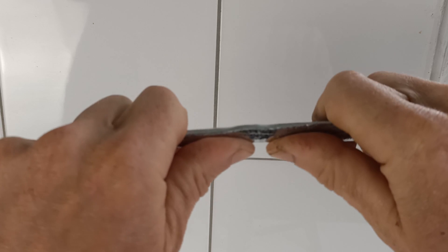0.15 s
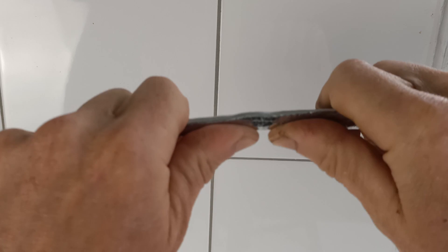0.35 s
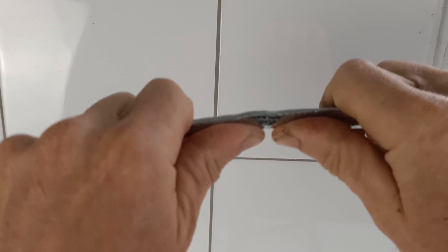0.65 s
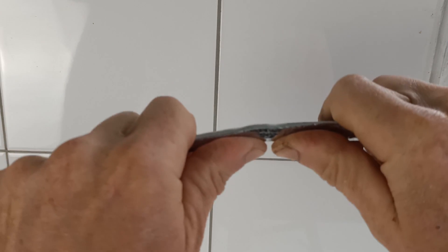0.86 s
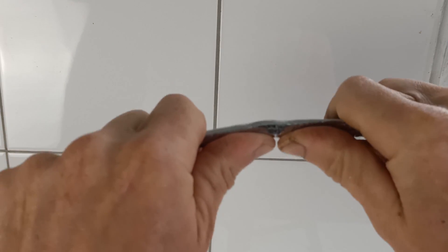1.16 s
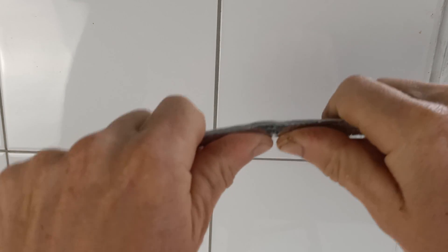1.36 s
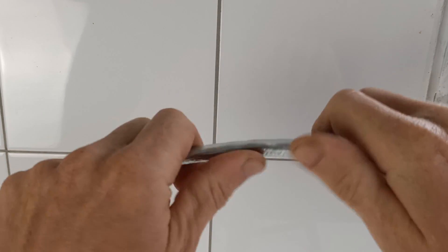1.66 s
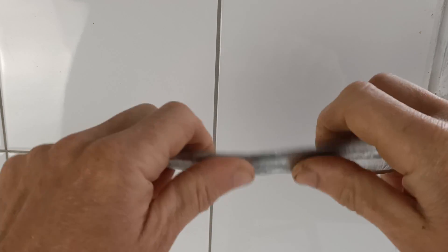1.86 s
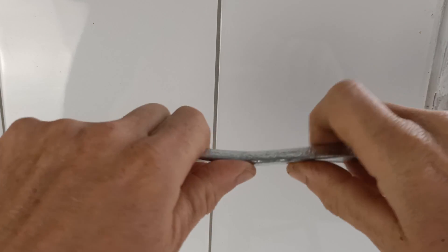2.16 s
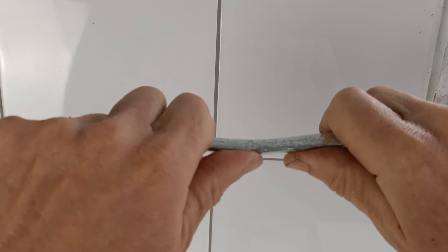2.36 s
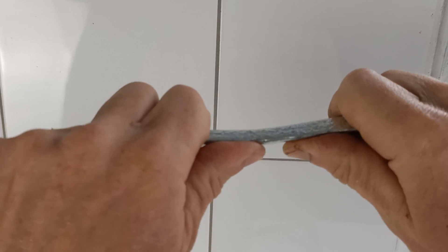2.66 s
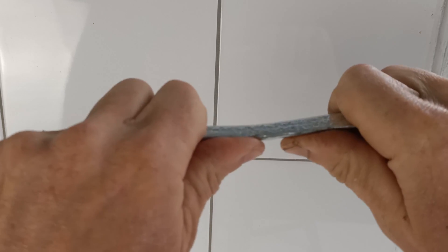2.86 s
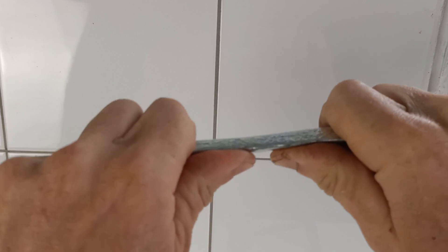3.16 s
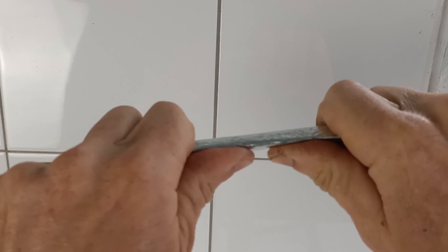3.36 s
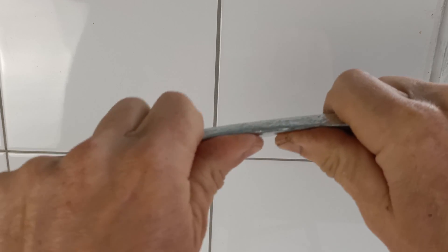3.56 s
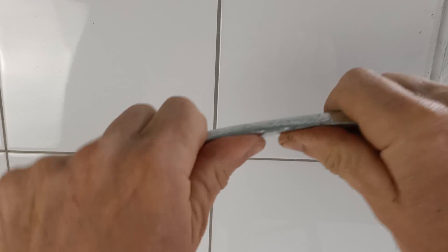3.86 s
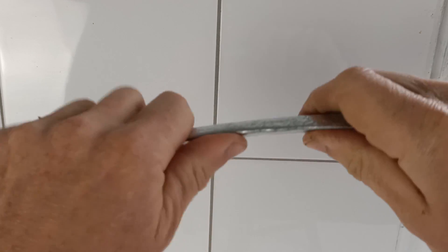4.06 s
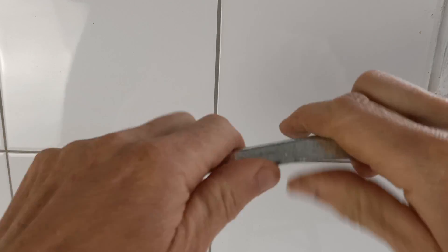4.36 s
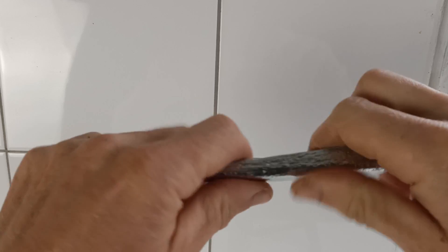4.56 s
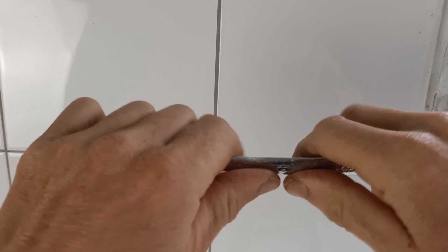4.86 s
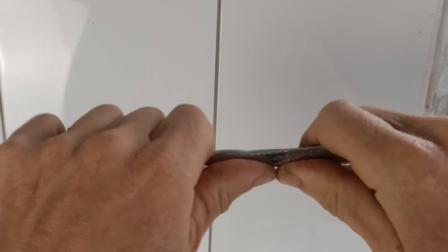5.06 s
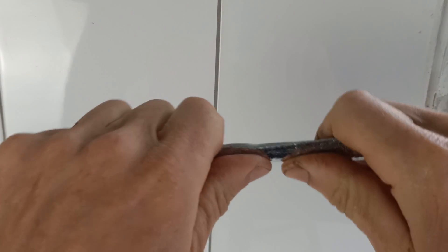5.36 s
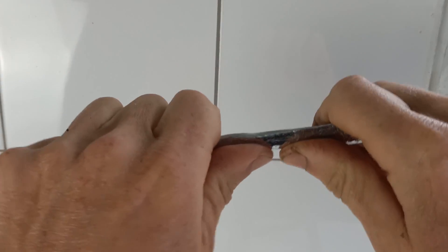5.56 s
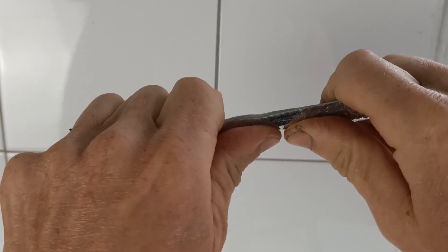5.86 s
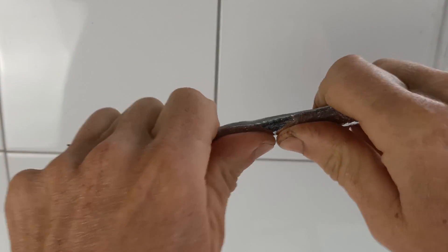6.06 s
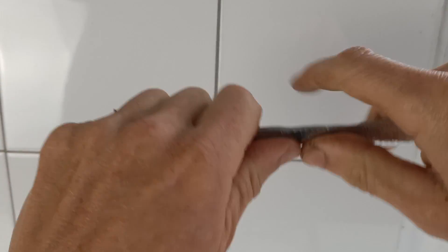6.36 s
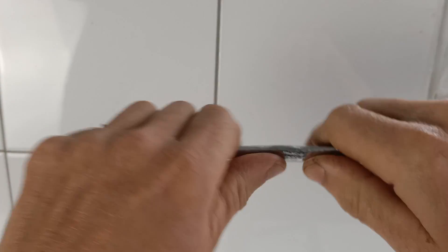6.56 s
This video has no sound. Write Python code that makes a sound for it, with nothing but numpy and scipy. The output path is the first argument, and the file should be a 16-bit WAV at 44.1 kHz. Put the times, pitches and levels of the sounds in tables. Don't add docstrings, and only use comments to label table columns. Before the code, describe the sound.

Close crisp snaps and showers of tiny ticks as a soft metal bar is flexed three times, the last bend barely whispering.

```python
import sys
import numpy as np
from scipy import signal
from scipy.fft import rfft, irfft, next_fast_len
from scipy.io import wavfile
from scipy.ndimage import uniform_filter1d

SR = 44100
rng = np.random.default_rng(int(sys.argv[2]) if len(sys.argv) > 2 else 0)


def waveform_to_disk(signal):
    frames = np.transpose(np.atleast_2d(signal))
    scaled = np.clip(frames, -1, 1) * 32767
    samples = np.round(scaled).astype(np.int16)
    wavfile.write(sys.argv[1], SR, samples)


def boost_factor(decibels):
    exponent = np.asarray(decibels, float) / 20
    return 10 ** exponent


N = 295911
BURST_SAMPLES = 1024

# hz [Hz], likeness [0..1, below 0 counts as 0]
NOISE_LIKENESS = [(60, 0.047), (380, -0.28), (2380, -0.15), (15000, -0.12)]


def at_hz(points, hz):
    table_hz, value = np.transpose(points)
    return np.interp(np.log(hz + 1), np.log(table_hz), value)


def in_time(rows, outside):
    s, *columns = np.transpose(rows)
    return [np.interp(np.arange(N) / SR, s, c, outside, outside) for c in columns]


def rms_one(x):
    return x / np.sqrt(np.mean(x ** 2) + 1e-20)


def split_at(x, hz, kind):
    return signal.sosfilt(signal.butter(4, hz, kind, fs=SR, output="sos"), x)


def spell(start_s, length_s, edge_s):
    age_s = np.arange(N) / SR - start_s
    return age_s, np.clip(np.minimum(age_s, length_s - age_s) / edge_s, 0, 1)


def pair(mid, side, likeness, balance_db):
    alike = np.clip(likeness, 0, 1)
    mid = np.sqrt(1 + alike) * mid
    side = np.sqrt(1 - alike) * side
    return np.array([(mid + side) * boost_factor(balance_db / 2), (mid - side) * boost_factor(-balance_db / 2)])


def coloured(spectrum, likeness, balance):
    size = next_fast_len(N)
    hz = np.fft.rfftfreq(size, 1 / SR)
    mid, side = rfft(rng.standard_normal((2, size)))
    both = pair(mid, side, at_hz(likeness, hz), at_hz(balance, hz))
    return rms_one(irfft(both * boost_factor(at_hz(spectrum, hz)), size)[:, :N])


def room_tone():
    tone_spectrum = [(180, -28), (300, -6), (484, -1.5), (590, -2.5), (769, -3.5), (1050, -5.5),
                     (1670, -2.5), (2040, -5.5), (2480, -6.5), (2690, -6.5), (3690, -8), (5130, -14),
                     (8560, -11.5), (9600, -13.5), (15500, -12)]
    tone_balance = [(60, 19), (180, 15), (550, 5), (1650, 10), (4970, 4), (15000, 1.5)]
    return boost_factor(-53) * coloured(tone_spectrum, NOISE_LIKENESS, tone_balance)


def tremor():
    # s [s], level_db [dB]
    effort = [
        (0.0, -63),
        (1.14, -57.5),
        (1.34, -61.5),
        (2.49, -63),
        (3.12, -56),
        (4.09, -61.5),
        (5.53, -63.5),
        (5.79, -60),
        (6.71, -64.5),
    ]
    rumble_spectrum = [(12, -22), (20, 1), (27, -22), (46, -7.5), (70, -5.5), (98, -2), (300, -12.5),
                       (390, -13), (660, -120)]
    casing_spectrum = [(150, -50), (225, -26), (255, 8.5), (290, -11), (420, -24.5)]
    # middle_s [s], half_length_s [s], level_db [dB]
    hum_spells = [
        (1.098, 0.23, -54),
        (4.497, 0.83, -60.5),
        (5.806, 0.28, -66.5),
    ]
    rumble_db, = in_time(effort, None)
    t_s = np.arange(N) / SR
    hum = sum(boost_factor(level_db) * np.exp(-((t_s - middle_s) / half_s) ** 2)
              for middle_s, half_s, level_db in hum_spells)
    alike, lean_db = [(30, 0.5), (300, 0.24)], [(30, 11.0), (300, 4.7)]
    rumble = boost_factor(rumble_db + 3.0) * coloured(rumble_spectrum, alike, lean_db)
    return rumble + hum * coloured(casing_spectrum, alike, lean_db)


def bursts(low_db, top_db, life_s, ring):
    # hz [Hz], density_db [dB per Hz]
    left_spectrum = [(80, -59), (200, -17), (900, -24), (1400, -16), (1800, -21.5), (2700, -11),
                     (3400, -10.5), (4500, -16.5), (6000, -11), (7200, -8), (8500, 1.5), (9700, -0.5),
                     (11000, -12), (15500, -10.5)]
    # hz [Hz], density_db [dB per Hz]
    right_spectrum = [(80, -27), (300, -19), (900, -26), (1400, -17.5), (1800, -19.5), (3300, -11),
                      (4500, -16), (6600, -1), (8200, -10), (9400, -5.5), (11200, -6.5), (12800, -6.5),
                      (13800, 0), (15500, -8)]
    snap_likeness = [(300, 1), (1400, 0.85), (3000, 0.55), (4400, 0.11), (6200, 0.79), (9000, 0.16),
                     (12000, 0.43)]
    crack_db, crack_t60_s, right_lag_s = 10, 0.0022, -0.000014
    t_s, hz = np.arange(BURST_SAMPLES) / SR, np.fft.rfftfreq(BURST_SAMPLES, 1 / SR)
    age_s = np.maximum(t_s - 26 / SR, 0)
    rattle = boost_factor(-60 * age_s / life_s[:, None, None])
    crack = boost_factor(crack_db - 60 * age_s / crack_t60_s)
    shape = (1 - np.exp(-age_s / 0.00018)) * (rattle + crack)
    spectra = rfft(rng.standard_normal((len(life_s), 2, BURST_SAMPLES)) * shape)
    spectra = spectra / np.sqrt(uniform_filter1d(np.abs(spectra) ** 2, size=36))
    left, right = pair(spectra[:, 0], spectra[:, 1], at_hz(snap_likeness, hz), 0)
    lag = np.exp(-2j * np.pi * hz * right_lag_s)
    both = np.array([left * boost_factor(at_hz(left_spectrum, hz)), right * boost_factor(at_hz(right_spectrum, hz)) * lag])
    end_hz, width_hz, end_db = ring
    both = both * boost_factor(end_db * np.exp(-((hz - end_hz) / width_hz) ** 2))
    peak = np.sqrt(np.mean(irfft(both) ** 2, axis=0).max(axis=1))
    low = 1 / (1 + (hz / 4700) ** 8)
    top = 1 / (1 + (11300 / (hz + 1)) ** 12)
    colour = boost_factor(np.outer(low_db, low) + np.outer(top_db, top))
    return irfft(both * colour / peak[:, None])


def showers(per_s, spread_db):
    # s [s], level_db [dB]
    effort_curves = [
        [(0.15, -66), (0.49, -45.5), (0.62, -51), (0.724, -45.5), (1.01, -77), (1.086, -38.5), (1.22, -39),
         (1.3, -77)],
        [(2.7, -63), (2.84, -29.5), (2.94, -36.5), (3.1, -32), (3.47, -38.5), (3.644, -33.5), (3.85, -57.5)],
        [(5.5, -68), (5.566, -59.5), (5.84, -53.5), (5.87, -46.5), (6.1, -59.5), (6.15, -90)],
    ]
    body_db = [
        -0.5,
        -5,
        -4.5,
    ]
    ticks = (rng.random(N) < per_s / SR) * boost_factor(spread_db * np.minimum(rng.exponential(1, N), 4))
    kinds = bursts(np.zeros(12), np.zeros(12), np.full(12, 0.004), (9050, 850, 5.5))
    dealt = rng.integers(0, 12, N)
    hail = 0
    for k in range(12):
        hail = hail + signal.fftconvolve(ticks[None] * (dealt == k), kinds[:, k], axes=1)[:, :N]
    hail = rms_one(hail)
    low, high = split_at(hail, 4700, "low"), split_at(hail, 4700, "high")
    out = 0
    for rows, low_db in zip(effort_curves, body_db):
        level_db, = in_time(rows, -150)
        out = out + boost_factor(level_db) * (high + boost_factor(low_db + 9) * low)
    return out


def snaps(rows, ring, top_db):
    s, peak_db, t60_ms, low_db = np.transpose(rows)
    top_db = top_db + 3 * rng.standard_normal(len(s)) - 0.28 * (peak_db + 14)
    life_s = 1.81 * np.clip(t60_ms, 1, 22) / 1000
    sounds = bursts(low_db + 10.5, top_db + 7.5, life_s, ring) * boost_factor(peak_db + 2.5)[:, None]
    out = np.zeros((2, N + BURST_SAMPLES))
    for k, at in enumerate(np.round(s * SR).astype(int) - 32):
        out[:, at:at + BURST_SAMPLES] += sounds[:, k]
    return out[:, :N]


def tiled_room(x, gap_s):
    tile_bands = np.array([(500, 0.34, 1), (2580, 0.25, 4), (4470, 0.29, 3), (5960, 0.2, 7),
                           (8900, 0.24, -3), (15000, 0.15, 6.5)])
    early_t60_s, late_db = 0.07, 1
    t_s = np.arange(SR // 2) / SR
    edges_hz = 200 * 2.0 ** np.arange(0, 6.6, 1 / 3)
    tail = 0
    for low, high in zip(edges_hz, edges_hz[1:]):
        sos = signal.butter(2, [low, high], "band", fs=SR, output="sos")
        band = signal.sosfilt(sos, rng.standard_normal((2, len(t_s))))
        t60_s, level_db = (at_hz(tile_bands[:, [0, k]], np.sqrt(low * high)) for k in (1, 2))
        decay = boost_factor(-60 * t_s / early_t60_s) + boost_factor(late_db - 60 * t_s / t60_s)
        tail = tail + band * boost_factor(level_db) * decay
    tail = tail * np.clip(t_s / gap_s - 1, 0, 1)
    return signal.fftconvolve(x, tail / np.sqrt(np.sum(tail ** 2) / 2), axes=1)[:, :N]


def knocks():
    grip_knocks = [
        (0.494, -35, 16.5),
        (.4995, -41, 20.5),
        (3.911, -47, 1),
        (3.941, -52.5, 0),
        (4.239, -34.5, 6.5),
        (4.372, -54, 11),
        (4.530, -49, 2),
        (4.555, -51, -4),
        (5.018, -55, -3),
    ]
    # hz [Hz], level_db [dB], t60_s [s]
    hand_modes = [
        (102, 8.5, 0.032),
        (187, 7.5, 0.027),
        (240.5, 9, 0.07),
        (449.5, -4, 0.05),
        (1110, -19, 0.1),
    ]
    s, peak_db, upper_db = np.transpose(grip_knocks)
    out = np.zeros(N)
    for hz, level_db, t60_s in hand_modes:
        push = np.full(N, 1e-18)
        push[np.round(s * SR).astype(int)] = -boost_factor(peak_db + level_db - 7 + upper_db * (hz > 300))
        r, w = boost_factor(-60 / (t60_s * SR)), 2 * np.pi * hz / SR
        out += signal.lfilter([0, np.sin(w)], [1, -2 * r * np.cos(w), r * r], push)
    return signal.sosfilt(signal.butter(2, 55, "high", fs=SR, output="sos"), out) * boost_factor([[1.2], [-1.2]])


def whine(octave_db):
    whine_spells = [
        (1.31, 0.092, 800, 5, -66.5),
        (1.367, 0.33, 858, 12, -70.5),
        (1.956, .15, 787, -150, -75),
    ]
    flutter_sos = signal.butter(2, 14, fs=SR, output="sos")
    flutter = rms_one(signal.sosfilt(flutter_sos, rng.standard_normal(N)))
    out = 0
    for start_s, length_s, hz, glide, level_db in whine_spells:
        age_s, gain = spell(start_s, length_s, edge_s=0.024)
        phase = 2 * np.pi * (hz + glide * age_s / 2) * age_s
        tone = np.sin(phase) + boost_factor(octave_db) * np.sin(2 * phase)
        out = out + gain * boost_factor(level_db + 7.0 + 2.9 * flutter) * tone
    return out * boost_factor([[2.5], [-2.5]])


def slides():
    skin_slides = [
        (1.676, -68, 18, 0.23),
        (4.023, -55, 90, 0.096),
        (4.114, -67, 1, 0.43),
        (6.36, -66, 5, .1),
        (6.602, -47.5, 40, 0.052),
        (6.643, -48.5, 32, .1),
    ]
    skin_spectrum = [(880, -9), (1500, -9), (2110, -7), (3380, -1), (4060, -4), (5240, -17), (5670, -5),
                     (7160, 1), (11400, -2.5), (15500, -7.5)]
    gain = 0
    for start_s, level_db, fade_db, length_s in skin_slides:
        age_s, touch = spell(start_s, length_s, edge_s=0.017)
        gain = gain + touch * boost_factor(level_db + 7.0 - fade_db * np.clip(age_s, 0, length_s))
    lean_db = [(3000, 0), (6500, -6), (9000, 9.5), (14000, -13)]
    return gain * coloured(skin_spectrum, NOISE_LIKENESS, lean_db)


def scene():
    # s [s], peak_db [dB], t60_ms [ms], low_body_db [dB re peak]
    bend_1 = [(0.185, -30.5, 11, -6), (0.2727, -20.5, 6.2, -9), (0.302, -36, 8.5, -10), (0.366, -28, 7, -9),
              (0.408, -30, 8, -10), (0.4317, -25, 26, -6.5), (0.4643, -24, 8, -9), (0.4891, -16, 6.2, -0.5),
              (0.4936, -12.5, 10, 2), (0.4989, -8, 13, -10.5), (0.6504, -27.5, 7.9, -2),
              (0.6722, -12.5, 15.5, -5.5), (0.69, -18, 10, -9.5), (0.7526, -24, 5.1, -10),
              (0.7771, -18.5, 6.9, -9), (0.816, -11.5, 12.5, -6.5), (0.86, -20.5, 20, -10),
              (0.8779, -17.5, 14, -3), (0.8888, -12.5, 7, -9.5), (0.9034, -2, 2.9, -8.5),
              (0.9405, -7, 4, -6.5), (1.0323, -13, 9.8, -11), (1.0473, -27, 11, -10),
              (1.0663, -16, 14, -5.5), (1.117, -10, 13, -9), (1.1212, -7, 4.3, -11.5),
              (1.1459, -9.5, 8.2, -7), (1.1699, -9, 6.9, -3), (1.1775, -6.5, 21, -12),
              (1.219, -4.5, 7.9, -10)]
    bend_2 = [(2.751, -29, 14, -2), (2.7565, -18, 21, -19), (2.7662, -24, 5.1, -9), (2.7694, -18, 9, -7.5),
              (2.7824, -11.5, 8.8, -9.5), (2.7913, -6.5, 5.2, -13), (2.799, -7, 3.5, -30),
              (2.8357, -6, 3.2, -13), (2.8494, -13, 27, -7), (2.857, -9, 27, -17), (2.866, -9, 5, -5),
              (2.8721, -5, 18, -10.5), (2.8787, -15.5, 23, -9), (2.882, -10, 24, -16),
              (2.8897, -8, 7.8, -11), (2.8994, -18, 24, -6), (2.9164, -20, 6, -10), (2.9438, -16, 24, -13),
              (2.9606, -12, 28, -10.5), (3.0145, -8.5, 33, -14), (3.0247, -6, 21, -11),
              (3.0266, -21.5, 20, -3),
              (3.09, -15, 9.8, -18), (3.1188, -13, 11, -15), (3.139, -18, 2.5, -12),
               (3.157, -12.5, 28, -9), (3.181, -11.5, 7.3, -11), (3.1989, -3, 11.4, -13.5),
               (3.234, -16, 9.1, -10), (3.2402, -11, 3.5, -16), (3.257, -16, 23, -9.5),
               (3.274, -26, 7, -24), (3.2912, -5, 8.8, -15), (3.327, -12, 25, -9),
               (3.364, -6.5, 11.6, -9.5), (3.421, -19, 8.3, -24), (3.492, -9.5, 10, -11),
               (3.5278, -12.5, 5.3, -8.5), (3.5641, -2.5, 18.5, -7.5), (3.6098, -9.5, 13, -15),
               (3.6146, -5, 2.2, -6), (3.637, -30, 5.7, -6), (3.659, -19, 11, -7), (3.6755, -11, 2.1, -9),
               (3.718, -28, 7.2, -22), (3.758, -20, 8, -6.5), (3.7696, -8.5, 6.2, -9),
               (3.7815, -24, 5.3, -7)]
    bend_3 = [(5.63, -37, 6, -14), (5.6815, -40, 6, -12), (5.7032, -33, 8, -6), (5.7641, -44, 10, -6),
              (5.883, -35, 24, -19), (5.898, -29, 5.5, -8), (5.911, -36, 8, -17), (5.916, -34, 10, -15),
              (5.9605, -32.5, 8, -8), (5.9687, -34.5, 21, -7), (6.0131, -36, 21, -4), (6.0265, -31, 4, -2),
              (6.0727, -44, 6, -9)]
    finger_ticks = [(1.674, -32.5, 8.5, 0), (1.7512, -39.5, 19, 0), (4.0237, -31, 14, -0.5),
                    (4.0616, -45, 21, 3), (4.1887, -39, 23, -3), (4.916, -44, 21, -1), (5.0, -44, 21, -8),
                    (5.012, -44, 21, 0), (6.365, -35, 16, -4), (6.6066, -34.5, 24, -6),
                    (6.6161, -31.5, 10, -1.5)]
    # hz [Hz], width_hz [Hz], level_db [dB]
    free_end = [
        (2220, 400, 6.5),
        (8700, 1000, 2),
        (9450, 1000, 8.5),
        (6000, 1900, 1.5),
    ]
    grip_top_db = [
        -12.5,
        -10.5,
        -10,
        -17,
    ]
    grips = zip([bend_1, bend_2, bend_3, finger_ticks], free_end, grip_top_db)
    first, second, third, fingers = (snaps(*grip) for grip in grips)
    bar = first + second + third + showers(per_s=450, spread_db=1.5)
    tail = tiled_room(boost_factor(-1.5) * bar + boost_factor(-7.5) * fingers, gap_s=0.00043)
    hands = fingers + knocks() + slides() + tremor()
    return bar + tail + hands + whine(octave_db=-4.5) + room_tone()


def band_limit(x):
    return signal.sosfilt(signal.butter(12, 16640, fs=SR, output="sos"), x)


def record(dry):
    limited = signal.sosfilt(signal.cheby2(13, 38, 15750, fs=SR, output="sos"), dry)
    mix = np.tanh(limited / 1.543) * 1.457 - 0.0015
    return band_limit(mix)


dry = scene()
out = record(dry)
waveform_to_disk(out)
```